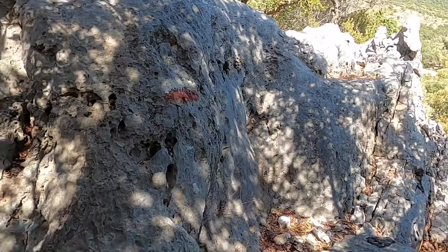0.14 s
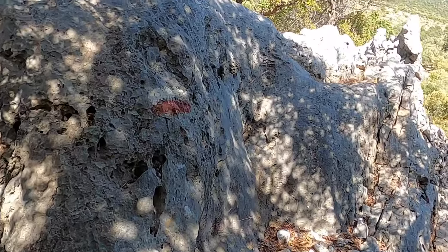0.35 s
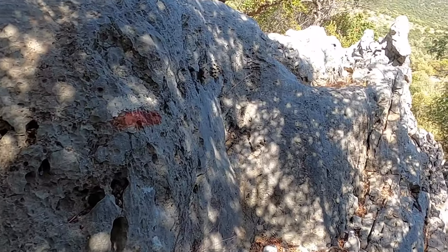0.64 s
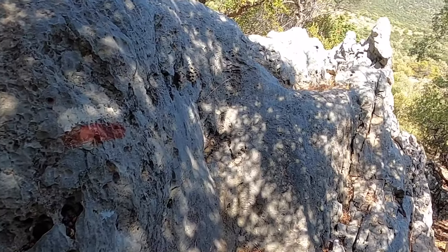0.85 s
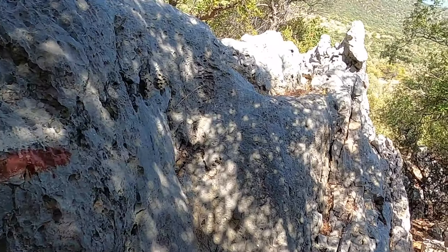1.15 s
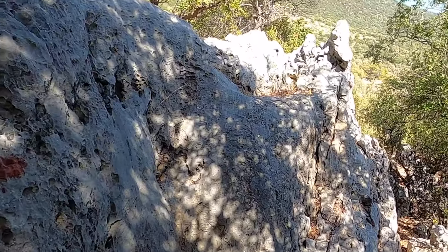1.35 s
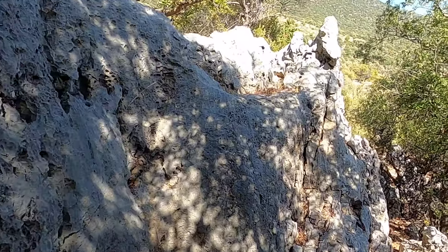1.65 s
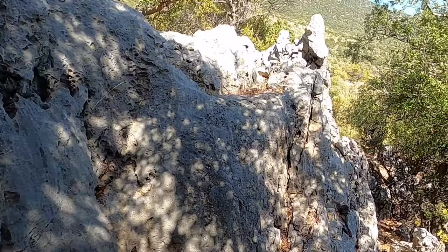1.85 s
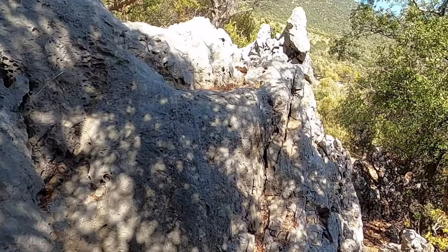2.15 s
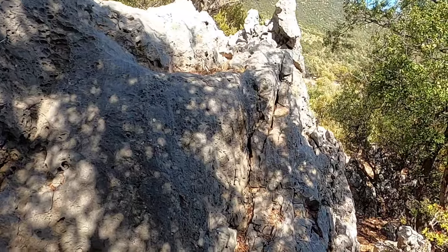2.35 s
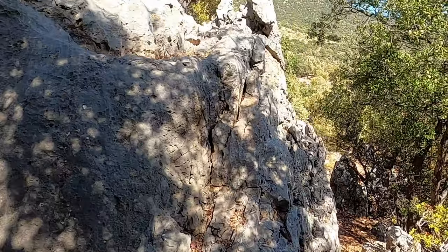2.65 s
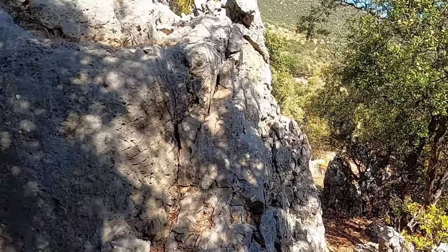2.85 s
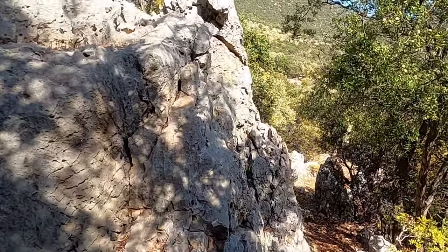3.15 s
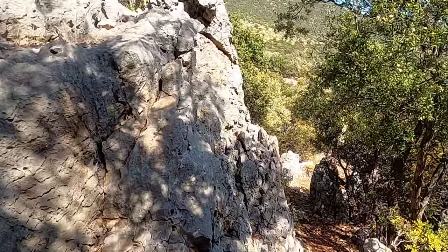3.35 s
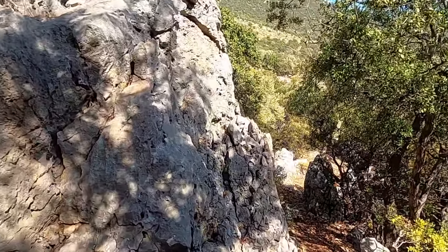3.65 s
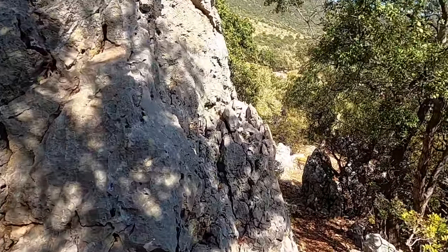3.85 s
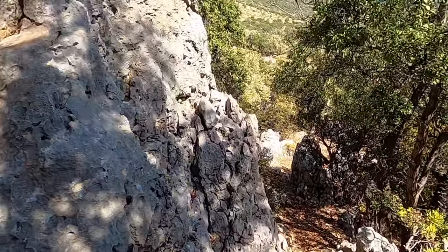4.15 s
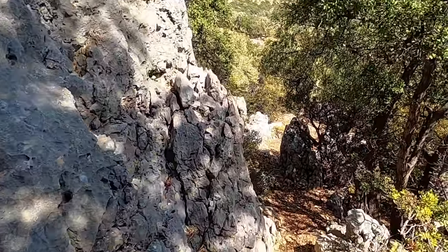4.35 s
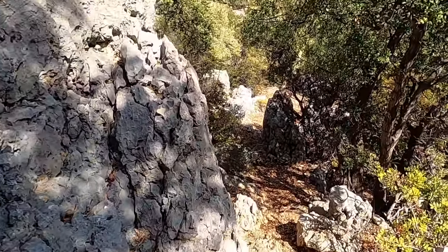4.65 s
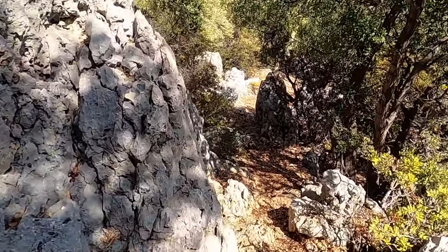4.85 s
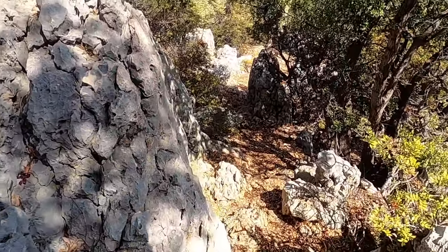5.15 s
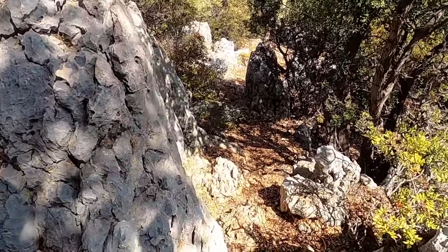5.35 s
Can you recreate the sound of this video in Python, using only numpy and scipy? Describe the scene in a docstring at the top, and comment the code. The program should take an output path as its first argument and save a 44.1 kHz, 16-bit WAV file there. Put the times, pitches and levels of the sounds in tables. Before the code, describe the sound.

Hiking shoes thud, scuff and crunch over loose limestone and dry leaves while a hard pole tip clacks on rock, in soft outdoor air.

```python
"""Shoes scuff, thud and judder on a limestone trail, stones crack, and a hard tip clacks on the rock over a soft rush.
A hiker is walking, camera in hand; the tip is likely a walking pole's, a short ring with a skip, rock chips and shaft.
Soles are sagging low swings, stick-slip bumps and slides of tiny fractures over grit and dry leaves; stones are
pitched knocks with spits of noise. The outdoor rush and the light wind on the microphone ports are coloured noise."""
import sys
import numpy as np
from scipy import signal
from scipy.fft import rfft, irfft, next_fast_len
from scipy.io import wavfile
from scipy.ndimage import uniform_filter1d, map_coordinates

SR = 44100
rng = np.random.default_rng(int(sys.argv[2]) if len(sys.argv) > 2 else 0)


def generate_wav(signal):
    """Clip the signal to [-1, 1] and save it as 16-bit WAV at the path in sys.argv[1]."""
    frames = np.transpose(np.atleast_2d(signal))
    scaled = np.clip(frames, -1, 1) * 32767
    pcm = np.round(scaled).astype(np.int16)
    wavfile.write(sys.argv[1], SR, pcm)


N = 242550
AGE = np.arange(SR // 3) / SR  # time since a contact, s
# Event levels are relative: layer gains follow. Spectra give only a colour: the coloured noise is scaled to rms 1.

# Outdoor rush over time. Each row: time in seconds, level in relative dB.
RUSH_LEVEL = [(0, -52.5), (1.7, -53), (3, -47), (4.2, -46), (5.5, -47.5)]
# Colour of the rush. Each row: frequency in Hz, density in relative dB per Hz.
RUSH_SPECTRUM = [(35, -91), (60, -54), (118, -30), (156, 2), (222, -3.5), (262, -6.5), (380, -3.5),
                 (503, -9.5), (1010, -5.5), (1200, -4), (1310, -3), (2350, -7.5), (3760, -20.5),
                 (7570, -27.5), (16000, -62.5)]
# Likeness of the rush at the two ports. Each row: frequency in Hz, left-right correlation from -1 to 1.
RUSH_LIKENESS = [(60, 0.15), (180, 0.71), (550, 0.86), (1650, 0.73), (4970, -0.33), (15000, -0.024)]
# Puffs of wind on the ports. Each row: start in seconds, length in seconds, level in relative dB.
GUSTS = [(0.005, 0.089, -28), (0.347, 0.1, -38.5), (0.9, 0.24, -46), (1.846, 0.057, -43),
         (2.114, 0.088, -38.5), (2.417, 0.24, -26.5), (2.776, 0.082, -30.5), (3.017, 0.045, -28),
         (3.522, 0.17, -31.5), (3.727, 0.25, -22.5), (3.96, 0.31, -27), (4.38, 0.38, -31.5),
         (5.02, 0.051, -46), (5.356, 0.12, -38)]
# Colour of the wind. Each row: frequency in Hz, density in relative dB per Hz.
WIND_SPECTRUM = [(8, -10), (20, -1), (35, -4), (60, -14), (100, -27.5), (200, -46), (600, -90)]
# Likeness of the wind at the two ports. Each row: frequency in Hz, left-right correlation.
WIND_LIKENESS = [(25, 0.85), (90, 0.11)]
# Soles sliding over stone and leaves.
# Each row: start in seconds, length in seconds, grinding in relative dB, rustle in relative dB.
SCUFFS = [(-0.02, 0.047, -40, -48.5), (0.054, 0.042, -43, -63), (0.211, 0.18, -41.5, -54),
          (0.44, .26, -57, -64.5), (0.735, 0.075, -33.5, -52), (0.969, 0.025, -36.5, -46),
          (0.982, 0.21, -44.5, -60), (1.447, 0.26, -50, -61), (1.762, 0.27, -43, -51.5),
          (2.105, 0.17, -48.5, -49), (2.42, 0.022, -35, -49.5), (2.461, 0.086, -40.5, -57),
          (2.831, 0.072, -32.5, -41), (2.928, 0.058, -31.5, -44.5), (3.0, 0.047, -46, -52),
          (3.05, 0.08, -39, -52), (3.156, 0.13, -40, -51), (3.34, 0.026, -48, -56),
          (3.375, 0.085, -35, -46), (3.438, 0.021, -35, -52), (3.527, 0.03, -42, -56),
          (3.581, 0.08, -40.5, -51), (3.7, 0.078, -47, -63), (3.77, 0.1, -41.5, -57),
          (3.88, 0.049, -37, -44.5), (3.925, 0.046, -37.5, -47.5), (4.007, .02, -42, -52),
          (4.042, 0.037, -42, -51), (4.32, 0.0048, -44, -39.5), (4.459, 0.027, -38.5, -43),
          (4.48, 0.11, -40, -51), (4.642, 0.14, -39, -49.5), (4.976, 0.034, -42.5, -70)]
# Colour of grinding pebbles. Each row: frequency in Hz, density in relative dB per Hz.
GRIND_SPECTRUM = [(20, -79), (100, -17), (220, 3), (450, 4), (730, -6.5), (1050, 0), (1900, -7), (2800, -5),
                  (4000, -32.5), (8000, -30.5)]
# Stones and twigs cracking underfoot. Each row: time in seconds, stone in relative dB, stone pitch in Hz,
# grit in relative dB, grit tilt in dB per octave.
CRACKS = [(0.738, -37, 945, -50, -8), (0.748, -34, 2000, -28.5, -18), (.755, -45, 1510, -37, -12),
          (0.781, -28, 1310, -45, -3), (.789, -37, 1720, -46, -5), (0.798, -25, 2030, -41, 0),
          (0.810, -37, 2100, -50, -2), (0.9658, -30, 1380, -25, -6), (.982, -35, 2270, -42.5, 20),
          (1.002, -45, 2600, -36.5, 0), (1.126, -42, 786, -44, 13), (1.6808, -55, 1540, -53, 4),
          (1.720, -49, 1500, -55, 2), (1.824, -41, 1280, -62, -8), (1.9334, -63, 1510, -45.5, -6),
          (2.429, -30.5, 1760, -53, -7), (2.462, -38, 1280, -45, 4), (2.597, -61, 1300, -59, 14),
          (2.802, -27.5, 1240, -48.5, 5), (2.835, -36, 1890, -33, -4), (2.844, -42, 1860, -28, -3.5),
          (2.857, -30, 950, -28.5, -16), (2.882, -33, 2470, -40, -9), (2.8895, -40, 2300, -36, -16.5),
          (2.934, -27, 1770, -31.5, -8), (2.985, -44, 1300, -39, 5), (3.004, -36.5, 2400, -49, -8),
          (3.05, -33, 2470, -43, -4), (2.951, -36, 1400, -49, -5), (2.9584, -35, 2400, -32.5, -1),
          (3.0617, -28.5, 1010, -34.5, 0), (3.09, -33.5, 1510, -37.5, -5), (3.093, -24.5, 1140, -30, -15),
          (3.102, -24, 1070, -44, 9), (3.169, -28.5, 1280, -42, 3), (3.176, -27.5, 1270, -45, -2),
          (3.187, -33, 1280, -53, -2), (3.401, -26.5, 1110, -45, 15), (3.4119, -28, 990, -52, -4),
          (3.419, -18.5, 1410, -37, -7), (3.425, -31, 1280, -41, -2), (3.4444, -31.5, 1820, -27.5, 8),
          (3.4614, -35, 1090, -42, 0), (3.5478, -29.5, 1990, -27, 4), (3.6531, -35.5, 2240, -42.5, -11),
          (3.767, -37, 1430, -34, -15), (3.803, -34.5, 2100, -42.5, 10), (3.8822, -27, 1640, -38.5, -15),
          (3.8893, -23.5, 910, -50, -10), (3.9034, -25, 1080, -49, -6), (3.917, -29, 1040, -41, -3),
          (3.935, -27, 1430, -32.5, -1.5), (3.938, -33, 1210, -33, -1), (3.958, -34, 910, -51, -4),
          (4.042, -32, 1660, -52, -8), (4.072, -43, 1010, -47, 3), (4.4512, -33, 1290, -28.5, 3),
          (4.467, -25.5, 1070, -40, -5), (4.4734, -36, 1280, -39, -2), (4.481, -32, 990, -47, -1),
          (4.489, -28.5, 594, -55, -6), (4.571, -39, 2230, -57, -11), (4.7185, -29, 2630, -40, 7),
          (4.732, -32, 1170, -38, 13), (4.745, -38, 2070, -42, 12), (4.759, -42, 3300, -51, -6),
          (4.785, -47, 3200, -57, -6), (5.0135, -36.5, 2220, -37.5, -17.5)]
# Colour of a stone's clatter. Each row: frequency in Hz, density in relative dB per Hz.
STONE_SPECTRUM = [(20, -40), (150, -21), (400, -2), (700, 6), (1200, 7.5), (2100, 1.5), (2800, -6.5),
                  (4000, -60), (8000, -61)]
# Colour of grit and leaves. Each row: frequency in Hz, density in relative dB per Hz.
GRIT_SPECTRUM = [(800, -84), (2200, 8), (3600, 9.5), (6500, 6), (8500, -2.5), (12000, -14.5), (16000, -37)]
# Soles landing. Each row: time in seconds, heel in relative dB, heel pitch in Hz,
# weight in relative dB, weight pitch in Hz.
THUDS = [(0.231, -13, 448, -55, 167), (.283, 0.5, 461, -19.5, 109), (0.42, -32, 248, -40, 150),
         (0.484, -21.5, 506, -41, 146), (0.736, -2.5, 910, -18, 190), (0.754, -20, 209, -23, 153),
         (0.768, -16.5, 238, -17.5, 94), (0.793, -22.5, 264, -26, 150), (0.9664, -12, 213, -34, 112),
         (.982, -14, 198, -22.5, 101), (1.171, -19, 262, -32.5, 182), (1.618, -33, 208, -36.5, 156),
         (1.691, -25, 354, -32.5, 112), (1.787, -20.5, 835, -53, 200), (2.274, -46, 297, -23, 156),
         (2.428, -15, 153, -49, 119), (2.801, -22, 244, -58, 150), (2.934, -13, 402, -22, 206),
         (2.977, -18.5, 260, -26, 120), (3.054, -13, 394, -42, 150), (3.41, -16.5, 300, -42, 152),
         (3.423, -20, 333, -38, 178), (3.88, -10, 487, -37, 253), (3.888, -9, 138, -14.5, 74.6),
         (3.928, -22.5, 189, -21, 107), (3.987, -23, 231, -27, 140), (4.042, -6.5, 555, -12.5, 191.4),
         (4.049, -11, 290, -19, 144), (4.468, -9.5, 328, -9, 129), (4.476, -13, 190, -14, 81),
         (4.571, -18.5, 430, -37, 130), (4.979, -23.5, 274, -48, 150), (5.293, -26.5, 240, -40, 130),
         (5.386, -23, 225, -30, 128), (5.475, -14, 216, -17.5, 106)]
# Colour of a sole's dull puff. Each row: frequency in Hz, density in relative dB per Hz.
SOLE_SPECTRUM = [(15, -27), (45, 11.5), (80, -13), (150, -7), (450, 1.5), (700, -10.5), (1200, -6),
                 (2500, -31), (6000, -67)]
# Rubber tread juddering over rock. Each row: start in seconds, length in seconds, level in relative dB, pitch in Hz.
DRAGS = [(0.313, 0.026, -37.5, 190), (0.504, 0.19, -51.5, 300), (0.835, 0.071, -41, 240),
         (0.998, 0.047, -41.5, 150), (1.78, 0.15, -49, 230), (2.885, 0.026, -31, 270),
         (2.941, .05, -35, 200), (2.997, 0.066, -36.5, 252), (3.487, 0.028, -40, 211),
         (3.87, 0.13, -38, 304), (4.439, 0.027, -34, 160), (4.553, 0.024, -35.5, 170)]
# Pole tip on rock. Each row: time in seconds, tip in relative dB, tip pitch in Hz, tip ring time (t60) in seconds,
# skip in relative dB, chipping in relative dB, shaft in relative dB.
TAPS = [(0.744, -11, 1750, 0.0066, -29, -38, -55), (0.7578, -9, 1820, 0.0048, -14, -33, -57),
        (0.7641, 4.5, 1740, 0.0096, -2, -32, -51), (0.7666, -0.5, 2020, 0.018, -17, -28, -46),
        (0.7734, 3, 1790, 0.01, 1.5, -32, -47), (0.7762, -11, 2090, 0.01, -22, -40, -44),
        (0.9334, -1.5, 2330, 0.01, -29, -41, -40), (1.0456, -16, 1670, 0.0037, -32, -45, -48),
        (1.059, -16.5, 2200, 0.0082, -25, -37, -53), (2.2741, -3, 2220, 0.0093, -35, -26, -33),
        (3.7848, -9, 2060, 0.0079, -38, -48, -52), (4.3223, -14, 2320, 0.0059, -23, -25.5, -35.5),
        (4.7068, 9, 1830, 0.0072, 2, -18, -25), (4.7713, -33, 1190, 0.013, -42, -41, -41),
        (5.4742, 7.5, 1830, 0.011, 2.5, -4.5, -24.5)]
# Modes of the pole's shaft. Each row: frequency in Hz, level in relative dB, ring time (t60) in seconds.
SHAFT_MODES = [(190, -14, .06), (443, -.5, .16), (1040, -8, .09), (1175, -4, .17), (1373, -7, .09),
               (1780, -11, .08), (2030, -8, .14), (2185, -4, .1), (2690, -10, .1), (3300, -15, .12),
               (3760, -15, .09), (5572, -18, .1), (8258, -24, .12)]
# Colour of chipping rock. Each row: frequency in Hz, density in relative dB per Hz.
CHIP_SPECTRUM = [(300, -30), (1200, 10), (2600, 6.5), (3800, -9), (4500, 0), (5600, -1), (7000, 2.5),
                 (7800, 5), (8800, -4), (10500, -18), (13000, -28), (16000, -23)]
# Colour of the clack scattered by the rock face. Each row: frequency in Hz, density in relative dB per Hz.
SCATTER_SPECTRUM = [(20, -48), (100, 5.5), (350, -3), (700, -13.5), (1200, 9), (2000, 4.5), (2800, 2.5),
                    (3600, -6.5), (6000, -9.5), (8000, -17.5), (11000, -27), (16000, -40)]
# Likeness of ground sounds at the two ports. Each row: frequency in Hz, left-right correlation.
GROUND_LIKENESS = [(100, 0.99), (600, 0.96), (1500, 0.96), (3000, 0.47), (6000, 0.61), (12000, 0.079)]
# Balance of ground sounds. Each row: frequency in Hz, left over right in dB.
GROUND_LEAN = [(100, -0.5), (500, 1), (1200, 2.5), (2300, 7), (4000, -0.5), (8000, -1), (12000, -0.5)]

# shape of a puff, and the breeze between puffs
GUST_RISE_SHARE, GUST_EASE_DB, GUST_T60_S, BREEZE_DB = 0.29, 7, 0.15, -57
# part of a slide spent swelling, under full weight and with none; grinding level at half weight
PRESS_SHARE, BRUSH_SHARE, HALF_WEIGHT_DB = 0.07, 0.67, -37
# level lost along a slide; its t60 afterwards, and the extra t60 per second of length
EASE_DB, LIFT_T60_S, LIFT_PER_LENGTH = 6.5, 0.13, 2.1
# loose pebbles under a slide: knock and grit over its weighted grinding, their scatter; typical pitch and its scatter
LOOSE_DB, LOOSE_GRIT_DB, LOOSE_SPREAD_DB = -2.5, -10, 0.5
LOOSE_HZ, LOOSE_OCTAVES = 1220, 0.49
SPECKS_PER_S = 1800  # crumbs falling from a cracked stone
HEEL_CYCLES = 9.3  # a heel's swing drops 60 dB in this many cycles
WEIGHT_LAG_S, WEIGHT_T60_S = 0.00891, 0.081  # the body's weight arrives just after the heel
# rate of the tread's slips, range of their sizes, cycles in which each drops 60 dB
SLIPS_PER_S, SLIP_RANGE_DB, SLIP_CYCLES = 210, 9, 3.4
DRAG_RISE_SHARE, DRAG_EASE_DB, DRAG_T60_S = 0.21, 5.5, 0.049  # shape of a drag
SKIP_S, SKIP_PITCH, SKIP_T60_S = 0.002073, 1.196, 0.0061  # the tip skips once: delay, pitch ratio, ring time
# the shaft rattles in the grip: phase scatter and its rate
SHAFT_WAVER_RAD, SHAFT_WAVER_PER_S = .3, 110
POLE_LAG_S, SHOE_LAG_S = .00006, .00001  # how much later the left port hears them
TOP_HZ = 15800  # upper band limit


def amp(db):
    """Decibels to gain."""
    return 10 ** (np.asarray(db) / 20)


def unit(x):
    """Scale to rms 1."""
    return x / np.sqrt(np.mean(x ** 2) + 1e-20)


def along(points, hz):
    """Read (Hz, value) points on a log frequency axis."""
    f, v = np.transpose(points)
    return np.interp(np.log(hz + 1), np.log(f + 1), v)


def wobble(rate, size=N):
    """A smooth random curve, rate knots a second."""
    knots = rng.standard_normal(int(size * rate / SR) + 4)
    return map_coordinates(knots, [np.arange(size) * rate / SR])


def filtered(x, response):
    """Shape x by a response of frequency."""
    n = x.shape[-1]
    m = next_fast_len(n + 8192)
    return irfft(rfft(x, m) * response(np.fft.rfftfreq(m, 1 / SR)), m)[..., :n]


def stereo(pair, spectrum, likeness):
    """Colour two unrelated signals and blend them into left and right, rms 1."""
    def response(hz):
        turn = np.arccos(np.clip(along(likeness, hz), -1, 1)) / 2
        return amp(along(spectrum, hz)) * [np.cos(turn), np.sin(turn)]

    mid, side = filtered(pair, response)
    return unit(np.array([mid + side, mid - side]))


def burst(spectrum):
    """Fresh coloured noise for one contact."""
    return stereo(rng.standard_normal((2, len(AGE))), spectrum, GROUND_LIKENESS)


def fade(t60, attack):
    """Envelope of a contact: a quick rise under an exponential decay."""
    return amp(-60 * AGE / t60) * (1 - np.exp(-AGE / attack))


def swell(start, length, rise_share, ease_db, t60):
    """Gain that rises, eases off slowly until its length is over, then dies away."""
    age = np.maximum(np.arange(N) / SR - start, 0)
    rise = np.minimum(age / (rise_share * length), 1)
    ease = -ease_db * np.minimum(age / length, 1)
    release = -60 * np.maximum(age - length, 0) / t60
    return rise * amp(ease + release)


def add(track, s, sound):
    """Mix a sound in at time s."""
    start = max(round(s * SR), 0)
    part = track[:, start:start + len(AGE)]
    part += sound[..., :part.shape[1]]


def outdoors(rush_db=2, wind_db=-3):
    """A soft, gently wavering rush, and low wind buffets that differ between the ports."""
    time, level_db = np.transpose(RUSH_LEVEL)
    level = uniform_filter1d(amp(np.interp(np.arange(N) / SR, time, level_db, left=-120, right=-120)), size=128)
    rush_noise = stereo(rng.standard_normal((2, N)), RUSH_SPECTRUM, RUSH_LIKENESS)
    rush = level * amp(rush_db + wobble(16)) * rush_noise
    puffs = sum(amp(db) * swell(s, length, GUST_RISE_SHARE, GUST_EASE_DB, GUST_T60_S) for s, length, db in GUSTS)
    wind_noise = stereo(rng.standard_normal((2, N)), WIND_SPECTRUM, WIND_LIKENESS)
    buffets = (amp(BREEZE_DB) + puffs) * amp(wind_db) * wind_noise
    return rush * amp([[.5], [-.5]]) + buffets * amp([[3], [-3]])  # both lean left


def pressed(grind_db):
    """Share of the body's weight on a sliding sole, judged from its grinding level."""
    return 1 / (1 + amp(HALF_WEIGHT_DB - grind_db) ** 2)


def slide(start, length, grind_db):
    """Gain of one slide: a heavy sole bites early, a light one swells slowly."""
    rise_share = BRUSH_SHARE + (PRESS_SHARE - BRUSH_SHARE) * pressed(grind_db)
    return swell(start, length, rise_share, EASE_DB, LIFT_T60_S + LIFT_PER_LENGTH * length)


def grains(spectrum, rate, top_hz, t60, spread_db, share):
    """A smooth rub mixed with tiny fractures, each ringing briefly at its own pitch and strength."""
    count = int(rate * N / SR)
    when, pitch, strength, phase = rng.random((count, 4)).T[..., None]
    age = AGE[:int(t60 * SR)]
    size = amp(spread_db * np.minimum(-np.log(1 - strength), 3))  # mostly small, a few strong
    index = (when * N).astype(int) + np.arange(len(age))

    def fractures(turn):
        ring = size * np.sin(2 * np.pi * (top_hz * pitch * age + turn)) * amp(-60 * age / t60)
        return np.bincount(index.ravel(), ring.ravel(), N)[:N]

    pair = np.array([fractures(0), fractures(phase)])
    rub = rng.standard_normal((2, N))
    return stereo(np.sqrt(share) * unit(pair) + np.sqrt(1 - share) * rub, spectrum, GROUND_LIKENESS)


def scuffs(grind_gain_db=-2, rustle_gain_db=0.5):
    """A light sole mostly brushes; under weight it rolls pebbles and crushes dry leaves into separate fractures."""
    grinding, rustle = sum(amp([[grind_db], [rustle_db]]) * slide(s, length, grind_db)
                           for s, length, grind_db, rustle_db in SCUFFS)
    crushing = grinding ** 2 / (grinding ** 2 + amp(-40) ** 2)
    catching = amp(1.4 * wobble(110) + .6 * wobble(22))  # the tread catches and slips unevenly
    pebbles = grains(GRIND_SPECTRUM, rate=900, top_hz=4000, t60=.005, spread_db=5, share=crushing)
    leaves = grains(GRIT_SPECTRUM, rate=1500, top_hz=14000, t60=.0012, spread_db=4.5,
                    share=np.maximum(crushing, .25))
    return catching * (amp(grind_gain_db) * grinding * pebbles + amp(rustle_gain_db) * rustle * leaves)


def loose_pebbles(count=6):
    """Small cracks at random moments of each slide, the stronger the more weight is on it; rows as in CRACKS."""
    rows = []
    for start, length, grind_db, _ in SCUFFS:
        db = grind_db + 10 * np.log10(pressed(grind_db))
        for when, (knock, pitch, spit, tilt) in zip(rng.random(count), rng.standard_normal((count, 4))):
            stone_db = db + LOOSE_DB + LOOSE_SPREAD_DB * knock
            hz = LOOSE_HZ * 2 ** (LOOSE_OCTAVES * pitch)
            grit_db = db + LOOSE_GRIT_DB + LOOSE_SPREAD_DB * spit
            rows.append((start + when * length, stone_db, hz, grit_db, -4 + 4 * tilt))
    return rows


def trickle(spectrum, rate):
    """Separate specks at random moments, rate a second, for one contact."""
    specks = rng.standard_normal((2, len(AGE))) * (rng.random(len(AGE)) < rate / SR)
    return stereo(specks, spectrum, GROUND_LIKENESS)


def cracks(stone_gain_db=3, ring_gain_db=6, grit_gain_db=8.0, crumble_db=-17):
    """Each stone gives way with a short pitched knock and a sharp spit of grit, then crumbles into specks."""
    out = np.zeros((2, N))
    snap = fade(t60=.011, attack=.00012)
    knock = fade(t60=.018, attack=.0003)
    crumble = amp(crumble_db) * fade(t60=.08, attack=.003)
    for s, stone_db, hz, grit_db, tilt_db in CRACKS + loose_pebbles():
        ring = amp(ring_gain_db) * np.sin(2 * np.pi * hz * AGE) * knock
        clatter = amp(stone_gain_db) * burst(STONE_SPECTRUM) * (knock + crumble)
        # finer grit spits brighter: the tilt acts from the third point of the spectrum upwards
        tilted = [(f, db + tilt_db * np.log2(max(f, GRIT_SPECTRUM[2][0]))) for f, db in GRIT_SPECTRUM]
        grit = amp(grit_gain_db) * (burst(tilted) * snap + trickle(tilted, SPECKS_PER_S) * crumble)
        add(out, s, amp(stone_db) * (ring + clatter) + amp(grit_db) * grit)
    return out


def thuds(push_db=-2, heel_puff_db=-9, weight_puff_db=-14, sag=0.11):
    """A rubber sole lands, heel first and then the weight: each a damped low swing that sags, and a dull puff."""
    out = np.zeros((2, N))
    heels = [(s, db, hz, HEEL_CYCLES / hz, heel_puff_db) for s, db, hz, _, _ in THUDS]
    weights = [(s + WEIGHT_LAG_S, db, hz, WEIGHT_T60_S, weight_puff_db) for s, _, _, db, hz in THUDS]
    for s, db, hz, t60, puff_db in heels + weights:
        pitch = hz * (1 + sag * (np.exp(-AGE / 0.012) - .5))
        swing = amp(push_db) * np.sin(2 * np.pi * np.cumsum(pitch) / SR) * fade(t60, attack=0.0034)
        puff = amp(puff_db) * burst(SOLE_SPECTRUM) * fade(t60 * 1.07, attack=0.0043)
        add(out, s, amp(db) * (swing + puff))
    return out


def drags(count=3000):
    """The tread sticks and lets go at an uneven rate; every slip is one low bump of the sole."""
    gap, size, way = rng.random((count, 3)).T
    when = np.cumsum(.25 + 1.5 * gap) / SLIPS_PER_S
    kicks = np.sign(way - .5) * amp(SLIP_RANGE_DB * size)  # either direction
    slips = np.bincount((when * SR).astype(int), kicks, N)[:N]
    out = np.zeros(N)
    for start, length, db, hz in DRAGS:
        bump = np.sin(2 * np.pi * hz * AGE) * fade(SLIP_CYCLES / hz, attack=0.0011)
        judder = unit(signal.oaconvolve(slips, bump)[:N])
        out += amp(db) * swell(start, length, DRAG_RISE_SHARE, DRAG_EASE_DB, DRAG_T60_S) * judder
    return out


def shaft_ring():
    """The shaft's modes, blurred by its rattling in the grip."""
    ring = np.zeros(len(AGE))
    for hz, db, t60 in SHAFT_MODES:
        waver = SHAFT_WAVER_RAD * wobble(SHAFT_WAVER_PER_S, size=len(AGE))
        mode = np.sin(2 * np.pi * (hz * AGE + rng.random()) + waver)
        ring += amp(db + rng.normal(0, 1)) * mode * fade(t60, attack=0.00056)
    return ring


def pole(scatter_db=-20.5, echo_db=-23, echo_delay=0.0088):
    """The tip rings briefly, skips, chips the rock and shakes the shaft; the rock face returns and scatters it."""
    out = np.zeros((2, N))
    for s, db, hz, t60, skip_db, chip_db, shaft_db in TAPS:
        tip = amp(db) * np.sin(2 * np.pi * hz * AGE) * fade(t60, attack=0.00061)
        skip = amp(skip_db) * np.sin(2 * np.pi * hz * SKIP_PITCH * AGE) * fade(SKIP_T60_S, attack=0.00014)
        scatter = amp(db + scatter_db) * burst(SCATTER_SPECTRUM) * fade(t60=0.063, attack=0.00009)
        chip = amp(chip_db) * burst(CHIP_SPECTRUM) * fade(t60=.011, attack=.0002)
        shaft = amp(shaft_db) * shaft_ring()
        add(out, s, tip + shaft + chip + scatter)
        add(out, s + SKIP_S, skip)
        add(out, s + echo_delay, amp(echo_db) * tip)
    return out


def ports(x, lag):
    """Ground sound reaches the left port a moment later, and the camera body shades each port differently."""
    sides = np.array([[.5], [-.5]])
    return filtered(x, lambda hz: amp(sides * along(GROUND_LEAN, hz)) * np.exp(-2j * np.pi * hz * lag * sides))


def scene():
    """Open air, shoes and pole."""
    shoes = scuffs() + cracks() + thuds() + drags()
    return outdoors() + ports(shoes, SHOE_LAG_S) + ports(pole(), POLE_LAG_S)


def record(dry):
    """The camera overloads smoothly near full scale, then cuts steeply above its band limit."""
    clipped = dry / (1 + np.abs(dry) ** 8) ** (1 / 8)
    return filtered(clipped, lambda hz: 1 / (1 + (hz / TOP_HZ) ** 120))


dry = scene()
out = record(dry)
generate_wav(out)
```